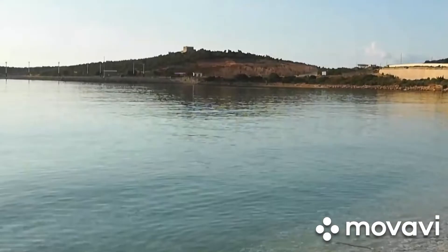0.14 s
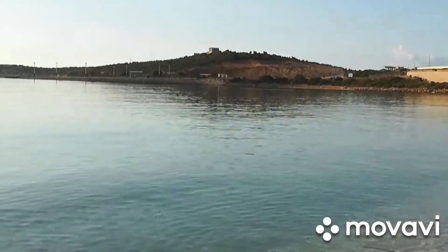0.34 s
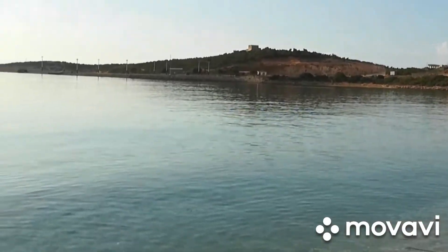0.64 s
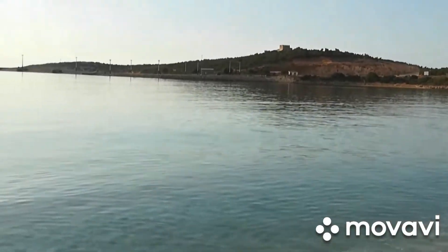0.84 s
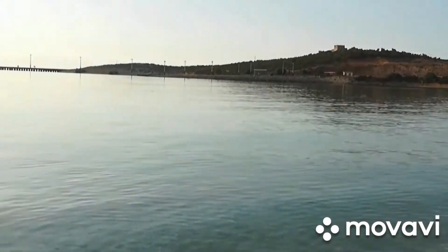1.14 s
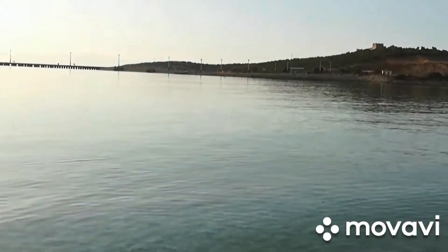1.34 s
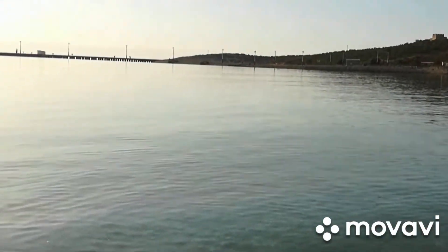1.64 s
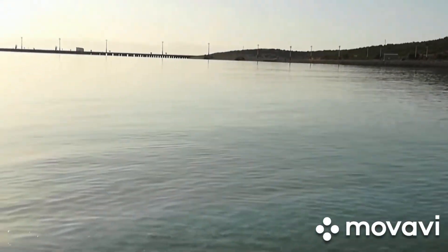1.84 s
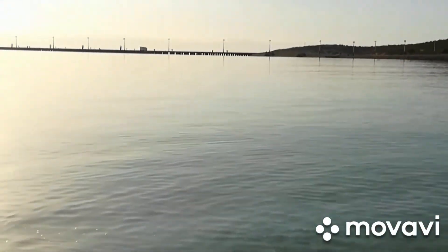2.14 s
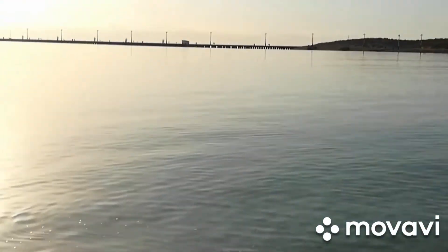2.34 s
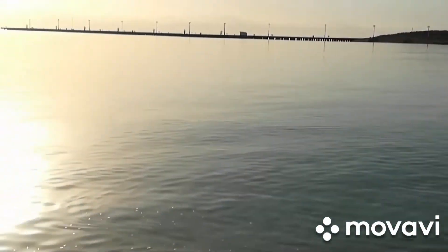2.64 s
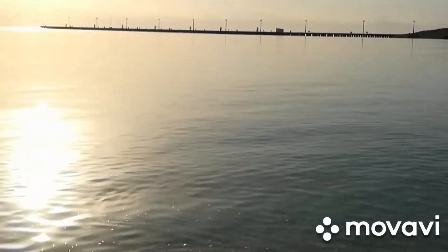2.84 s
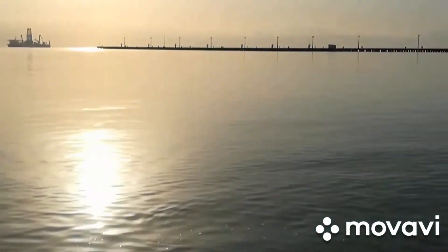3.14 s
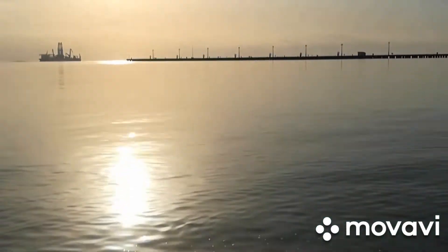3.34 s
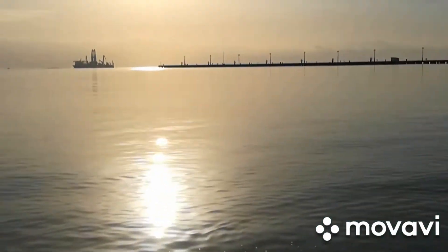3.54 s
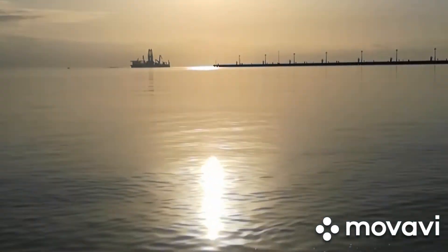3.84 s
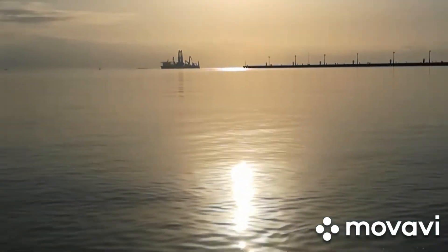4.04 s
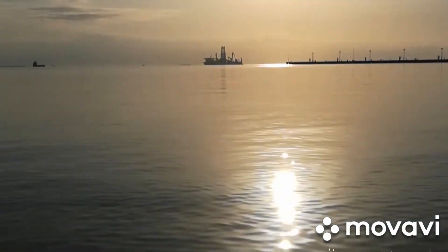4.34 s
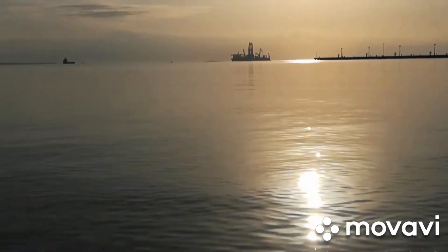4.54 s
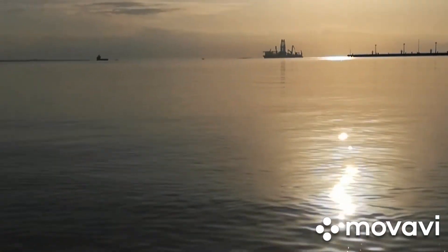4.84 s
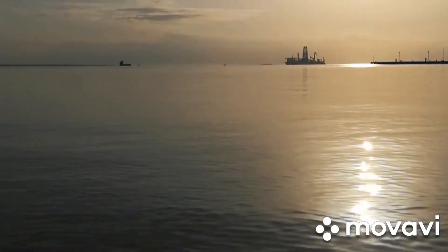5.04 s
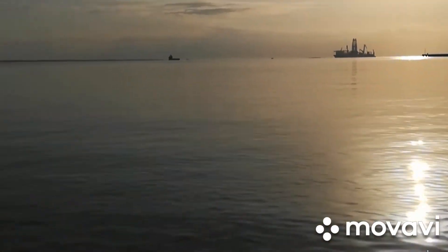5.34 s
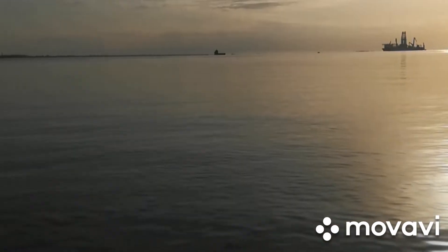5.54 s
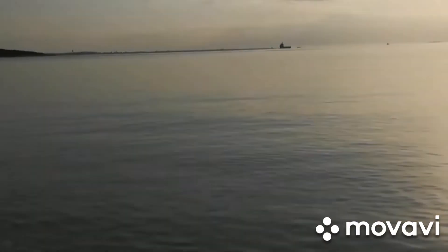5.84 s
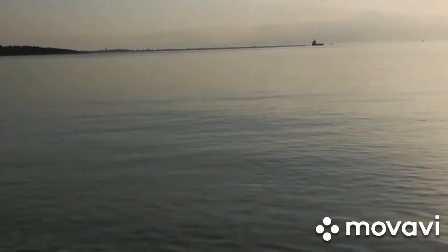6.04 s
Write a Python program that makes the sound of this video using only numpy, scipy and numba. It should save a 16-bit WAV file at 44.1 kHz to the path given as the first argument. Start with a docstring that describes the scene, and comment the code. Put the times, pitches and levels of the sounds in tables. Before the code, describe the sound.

Small waves lap and trickle at a pebble shore, with bright bubbling plips and ticks, over a steady low engine hum and dull distant roar.

```python
"""Small waves on a pebble shore

Small waves of a calm bay lap close to a hand-held pair of microphones.
Each wave is a swarm of dying, climbing sines for bubbles, with short bright ticks for bursting films.
Far engines give a steady hum (a wavering sine), a rumble and a dull roar (shaped noise that drifts).
A faint insect buzzes now and then: wing strokes as bursts of pulses that ring a high tone."""
import sys
import numpy as np
from scipy import signal
from scipy.fft import rfft, irfft
from scipy.io import wavfile
from scipy.ndimage import uniform_filter1d
from numba import njit

SR = 44100
rng = np.random.default_rng(int(sys.argv[2]) if len(sys.argv) > 2 else 0)


def store_pcm(level_fs):
    """Save levels as 16-bit WAV."""
    pcm = np.round(np.clip(level_fs, -1, 1) * 32767).astype(np.int16)
    wavfile.write(sys.argv[1], SR, np.atleast_2d(pcm).T)


N = 273420


def amp(db):
    """Decibels to gain."""
    return 10 ** (np.asarray(db) / 20)


def evened(x):
    """Scales to rms 1."""
    return x / np.sqrt(np.mean(x ** 2) + 1e-20)


def read(points, hz):
    """Reads a spectrum on a log-frequency axis."""
    f, value = np.transpose(points)
    return np.interp(np.log(hz + 1), np.log(f + 1), value)


@njit
def ring(n, sr, s, size, hz, pan_db, cycles, lag_s, rise, onset):
    """Each bubble is a dying sine whose pitch climbs as it nears the surface; the two ports hear it apart."""
    out = np.zeros((2, n))
    for k in range(len(s)):
        decay = cycles[k] / hz[k] / 2
        for ear in range(2):
            side = 1 - 2 * ear  # left +1, right -1
            start = s[k] + side * lag_s[k] / 2
            gain = size[k] * 10 ** (side * pan_db[k] / 40)
            first = int(start * sr) + 1
            for i in range(max(first, 0), min(first + int(5 * decay * sr), n)):
                u = (i / sr - start) / decay  # age in decay times
                turns = cycles[k] / 2 * u * (1 + rise[k] * (u - 1) / 2)
                envelope = (1 - np.exp(-u / onset)) * np.exp(-u)
                out[ear, i] += gain * envelope * np.sin(2 * np.pi * turns)
    return out


def lag(s, scatter_ms):
    """Arrival gap between the ports in seconds, from the bearing of the water line and a scatter along it."""
    # bearing of the water line: t/s, left lags/ms
    bearing = [(0, 0.21), (1.8, 0.26), (2.3, -0.21), (3.2, -0.031), (3.9, -0.057), (4.3, 0.36),
               (4.9, 0.394), (5.3, -0.075), (6.2, 0.16)]
    return (np.interp(s, *np.transpose(bearing)) + scatter_ms) / 1000


def strength(t):
    """Levels of the four bubble sizes and the place of the wash at times t."""
    # strength of the wash: t/s, large bubbles/dB, fine bubbles/dB,
    # step to each finer size/dB, left minus right/dB
    swell = [(0.0, -55.5, -58, -0.5, -6), (0.25, -50.5, -58.5, 1.5, -1.5), (0.5, -72, -66, 5.5, 3),
             (0.8, -57, -57, 2, 2.5), (1.1, -59, -57, -1, 0), (1.48, -49, -51, -0.5, 0),
             (1.85, -53.5, -53, -0.5, 0), (2.42, -66.5, -61, 0.5, -1.5), (2.78, -58.5, -60.5, 2, 1),
             (2.81, -49.5, -54.5, 0.5, 3), (2.92, -48, -52.5, 0.5, 2), (3.06, -46.5, -50, 0, 3.5),
             (3.6, -43, -47.5, 0.5, 2.5), (3.9, -46, -48.5, 0.5, 2), (4.12, -44, -45, -1, 1),
             (4.35, -46, -49, 1.5, 1), (4.65, -54, -50.5, 0.5, -2), (4.8, -55, -58.5, 0, -3),
             (4.9, -56.5, -55.5, -0.5, -2), (5.1, -60, -59.5, 4, 1.5), (5.8, -62.5, -61.5, 3, 2),
             (6.2, -68, -63.5, 4, 1)]
    s, *columns = np.transpose(swell)
    large_db, fine_db, finer_db, pan_db = (np.interp(t, s, v) for v in columns)
    spray_db = fine_db + finer_db - 3.5  # the finest size lies a little below the other fine ones
    return [large_db, fine_db - finer_db, fine_db, spray_db], pan_db


def slaps(t):
    """Gain of short slaps of water on the pebbles: each swells quickly and dies away."""
    # slaps: t/s, nominal rise over the wash/dB
    hits = [(0.045, 6.5), (0.065, 1), (0.125, 11.5), (0.22, 1), (0.478, 3), (0.85, 4), (2.805, 6),
            (3.53, 1), (3.66, 3.5), (3.878, 5), (4.03, 3.5), (4.08, 3.5), (4.705, 6), (4.782, 11.5),
            (4.844, 10)]
    rise_s, fall_s = 0.0037, 0.013
    gain = 1
    for s, db in hits:
        since = np.maximum(t - s, 0)
        gain = gain + 2 * (amp(db) - 1) * (1 - np.exp(-since / rise_s)) * np.exp(-since / fall_s)
    return gain


def wash():
    """Swarms of bubbles of four sizes, a few much louder than the rest, following the strength of the wave."""
    # bubble sizes: lowest f/Hz, highest f/Hz, bubbles a second, base length of ring/cycles,
    # spread of loudness/dB, tilt from lowest to highest/dB
    sizes = [(715, 2350, 3000, 5.85, 2, 12), (2617, 4710, 4000, 9.4, 2, 3.5),
             (4930, 7740, 6000, 5.7, 3.5, 3), (7800, 20000, 13000, 11.3, 3, 1.5)]
    t, out = np.arange(N) / SR, np.zeros((2, N))
    levels_db, pan_db = strength(t)
    # small splashes, hundredths of a second long, raise all the finer bubbles together
    splash_db = 1.17 * evened(uniform_filter1d(rng.standard_normal(N // 200 + 2), size=3))
    splash = amp(np.interp(t * SR / 200, np.arange(len(splash_db)), splash_db))
    slapped = slaps(t)
    for (low_hz, high_hz, rate, cycles, spread_db, tilt_db), db in zip(sizes, levels_db):
        when, pitch, loud, length, place, climb = rng.random((int(rate * N / SR), 6)).T
        at = when * N / SR
        across = 2 * place - 1
        fine = low_hz > 2000  # as an exponent: large bubbles ignore splashes and slaps
        size = amp(spread_db * np.minimum(-np.log(loud + 1e-9), 6) + tilt_db * pitch)
        hz = low_hz * (high_hz / low_hz) ** pitch
        bubble_pan_db = np.interp(at, t, pan_db) - 5 * across
        bubble_cycles = cycles * (0.86 + 0.99 * length)
        swarm = ring(N, SR, at, size, hz, bubble_pan_db, bubble_cycles,
                     lag(at, 0.1 * across), 0.061 * climb, 0.075)
        out += evened(swarm * splash ** fine) * slapped ** fine * amp(db)
    return out


def joined(table, per_s, low_hz, high_hz, over_db, size):
    """Columns of an event table, then lesser events at random whose level partly rides on one bubble size."""
    when, pitch, loud, place = rng.random((int(per_s * N / SR), 4)).T
    s = when * N / SR
    levels_db, pan_db = strength(s)
    # they follow the wash only in part about a middle level, so they stand out in the lulls
    follow, middle_db = 0.79, -52
    db = follow * (levels_db[size] - middle_db) + middle_db + over_db
    db = db - 2.5 * np.log(loud + 0.094)  # a few are much louder
    hz = low_hz * (high_hz / low_hz) ** (pitch ** 1.196)  # leans to the low pitches
    lesser = [s, db, hz, pan_db + 16 * (2 * place - 1)]
    return [np.append(a, b) for a, b in zip(np.transpose(table), lesser)]


def singles(s, db, hz, pan_db, cycles, rise, onset):
    """Plays columns of single bubbles, doubled in gain as onset and decay take off some of the peak."""
    # adding 0 * s turns a single setting into a column
    return ring(N, SR, s, 2 * amp(db), hz, pan_db, cycles + 0 * s, lag(s, 0), rise + 0 * s, onset)


def spatter(s, db, pan_db, low_hz, under_db):
    """A few milliseconds of eight weaker droplets of scattered pitch around each burst."""
    late, pitch, weak = rng.random((len(s) * 8, 3)).T
    at = np.repeat(s, 8) + 0.0049 * late - 0.0012
    droplet_db = np.repeat(db, 8) - under_db - 7.4 * weak
    hz = np.repeat(low_hz, 8) * 3.0 ** pitch
    return singles(at, droplet_db, hz, np.repeat(pan_db, 8), 3.4, 0.025, 0.22)


def plops():
    """Each small bubble rings amid the spatter of the drop that made it."""
    # the clearest small bubbles: t/s, nominal peak/dB, f/Hz, left minus right/dB
    clear = [(0.0424, -32, 3290, -15), (0.0617, -26, 6480, 15), (0.2259, -32, 4620, -16),
             (0.292, -34, 5500, -8), (0.481, -42, 4500, 0), (0.611, -45, 4460, 0), (0.7427, -39, 4300, -3),
             (0.759, -38.5, 4200, -14), (0.8355, -33.5, 3680, -8), (0.8679, -29.5, 3820, -6),
             (1.032, -37.5, 3960, -9), (1.2813, -29, 4320, -12), (1.3673, -26.5, 5900, 2),
             (1.4245, -26, 6600, 5), (1.488, -31, 4900, -3), (1.5529, -30, 3500, -5),
             (1.712, -33.5, 4200, -10), (1.7719, -32, 4100, -8), (1.7985, -25, 4060, -8),
             (1.8525, -35, 3250, 2), (1.925, -30.5, 3460, 11), (2.0228, -35, 3250, -3),
             (2.2938, -28.5, 6900, 4), (2.408, -42, 3980, -2), (2.463, -44, 3980, -6),
             (2.568, -41, 5500, 4), (2.7024, -40, 5710, 1), (2.805, -33.5, 2530, 11),
             (2.817, -23.5, 3340, 1), (3.0754, -31, 7160, 12), (3.257, -24.5, 3950, -4),
             (3.614, -30, 5970, 15), (3.7192, -25, 5450, 8), (3.75, -24.5, 4130, -6),
             (3.8804, -20, 6360, 11), (4.0796, -31.5, 3300, 15), (4.2114, -27, 3460, -4),
             (4.3755, -27, 5860, 0.0), (4.392, -20.5, 6200, 2), (4.417, -26.5, 5250, 2),
             (4.558, -39, 5500, -1), (4.6163, -34, 2740, -12), (4.7176, -28.5, 5000, -12),
             (4.785, -33, 5570, -1), (4.8065, -34, 5100, -10), (4.8464, -28, 6410, 8),
             (5.023, -35, 4730, -10), (5.6044, -39, 5900, 4), (5.966, -41, 4500, 3),
             (5.9878, -39.5, 2620, 2.5)]
    s, db, hz, pan_db = joined(clear, per_s=100, low_hz=2980, high_hz=7540, over_db=10, size=1)
    cycles = np.where(np.arange(len(s)) < len(clear), 9.1, 6.3)  # lesser drips ring shorter
    bubbles = singles(s, db, hz, pan_db, cycles, 0.022, 1.0)
    return bubbles + spatter(s + 0.001177, db, pan_db, 0.678 * hz, 11.0)


def snaps():
    """Each film bursts with one bright tick amid its spatter."""
    # bursting films, short and bright: crest t/s, nominal peak/dB, centre f/Hz, left minus right/dB
    films = [(0.0218, -31.5, 14500, 5), (0.1244, -34, 7840, 6), (1.5407, -35, 10200, 4),
             (1.5877, -31, 14100, 3), (1.7446, -33, 8400, -1), (1.9254, -33, 8000, -4),
             (2.1049, -40, 9200, -1), (2.82, -31, 8900, 6), (3.6393, -30, 12700, -3), (3.657, -32, 8800, 0),
             (3.7595, -31, 12900, -3), (3.8899, -22.5, 9700, -7), (3.9766, -31, 13900, -4),
             (4.024, -21.5, 12800, -7), (4.086, -28, 11000, -9), (4.1505, -32, 13300, -8),
             (4.226, -31, 9600, -6), (4.2404, -20.5, 10700, -5), (4.2828, -31, 11200, -8),
             (4.323, -33, 11200, -12), (4.3923, -30, 10600, -10), (4.4156, -32, 10700, -13),
             (4.4467, -29, 8800, -6), (4.491, -28, 9200, 0), (4.5579, -27, 8800, -7),
             (4.643, -34.5, 8850, -10), (4.7857, -33, 8700, -13)]
    s, db, hz, pan_db = joined(films, per_s=20, low_hz=8000, high_hz=14000, over_db=7.5, size=3)
    ticks = singles(s - 1 / hz, db, hz, pan_db, 4.2, 0.02, 0.26)  # starts one cycle ahead of the crest
    return ticks + spatter(s, db, pan_db, np.full_like(s, 5000), 6.2)


def glugs():
    """Large bubbles ring longer and climb in pitch."""
    # large bubbles, heard as glugs: t/s, nominal peak/dB, f/Hz, left minus right/dB,
    # pitch climb per decay time/share
    large = [(0.122, -41.5, 1610, -16, 0.23), (.139, -38, 2650, -12, 0.14), (.175, -39.5, 1560, -18, 0.2),
             (1.649, -29, 1370, 0, 0.032), (2.847, -35, 1740, 5, 0.31), (2.896, -33, 2030, -2, .03),
             (3.074, -35, 1780, -9, 0.13), (3.139, -33, 1600, -5, 0.23), (3.529, -28, 1940, -2, 0.0004),
             (3.59, -33.5, 1035, 0, .2), (3.935, -41, 820, -11, 0.25), (3.976, -37, 1460, 2, 0.14),
             (4.054, -35.5, 1480, -1, 0), (4.13, -31.5, 1460, 2, 0.17), (4.19, -44, 720, -19, 0.34),
             (4.329, -38, 2250, 1, 0.041), (4.446, -38, 948, -11, 0.059), (4.781, -35.5, 1500, -5, 0.053),
             (5.488, -47, 2820, 11, .04), (5.512, -49, 3350, 0, .03), (5.54, -42.5, 1460, -1, 0.21),
             (5.54, -48.5, 650, -8, 0), (5.597, -42, 1270, 0, 0.027), (5.825, -44, 2000, 3, 0),
             (5.866, -46, 1550, 2, 0), (5.919, -44, 2080, 0, 0.026)]
    s, db, hz, pan_db = joined(large, per_s=25, low_hz=799, high_hz=2294, over_db=4.5, size=0)
    climb = np.append(np.transpose(large)[-1], 0.147 * rng.random(len(s) - len(large)))
    return singles(s, db, hz, pan_db, 13.34, climb, 0.8)


def insect():
    """Every wing stroke drags a few file teeth over a scraper and rings the wing."""
    # buzzes: start t/s, end t/s, level ahead of the band-pass/dB
    buzzes = [(.62, .68, -65), (.73, .83, -62), (.83, .93, -64.5), (.94, 1.04, -69), (5.24, 5.31, -64),
              (5.31, 5.38, -67), (5.46, 5.49, -67), (6.14, 6.2, -66)]
    stroke_hz, tooth_hz = 200, 1048
    wing_hz = 10 * tooth_hz
    t = np.arange(N) / SR
    into = (t * stroke_hz % 1) / stroke_hz  # time since the stroke began
    teeth = np.exp(-(into * tooth_hz % 1) / 0.07) * np.sin(np.pi * into * stroke_hz) ** 2
    buzz = evened(teeth * np.cos(2 * np.pi * wing_hz * into))
    band = signal.butter(2, [9000, 12800], "bandpass", fs=SR, output="sos")
    buzz = signal.sosfilt(band, buzz)
    on = sum(amp(db) * np.clip(np.minimum(t - a, b - t) / 0.0075, 0, 1) for a, b, db in buzzes)
    return buzz * on * amp([[-1.5], [1.5]])  # a little to the right


def hum():
    """One steady engine tone that wavers a little on its way over the water."""
    hum_hz, hum_db = 76.34, -43
    t = np.arange(N) / SR
    waver = evened(sum(np.sin(2 * np.pi * (f * t + rng.random())) for f in np.geomspace(0.5, 9, 20)))
    return np.sqrt(2) * amp(hum_db + 0.5 * waver) * np.sin(2 * np.pi * hum_hz * t)


def far():
    """Random short-time spectra with soft patches; rumble, drone and roar drift on their own."""
    # far rumble, roar and the steady hiss of air and water: f/Hz, relative level per Hz/dB
    colour = [(12, -46), (20, -14), (53, -8.5), (81, -9.5), (101, -7), (123, -11), (216, -13.5),
              (459, -28.5), (558, -27.5), (1000, -20), (2390, -37.5), (6540, -47.5), (9670, -49.5),
              (14700, -65), (16000, -39)]
    # drift, of which the three levels count only as departures from their means:
    # t/s, rumble/dB, drone/dB, roar/dB, roar left minus right/dB
    drift = [(0.0, -51, -60, -49.5, 7.5), (0.5, -48.5, -60, -50.5, 8), (1.2, -52, -65.5, -53.5, 1.5),
             (2.0, -49, -63.5, -50, 1.5), (2.75, -51.5, -62, -53.5, 7.5), (3.3, -51.5, -60, -54, -12),
             (4.2, -52.5, -65.5, -58, -21), (5.0, -52, -68, -55, 4.5), (5.8, -50.5, -68.5, -58.5, 2.5),
             (6.2, -59, -66.5, -60, 4)]
    # left-right likeness of the far sounds: f/Hz, likeness (0 to 1)
    likeness = [(60, 0.99), (150, 0.99), (270, 0.99), (450, 0.52), (700, 0.29), (950, 0.72), (1500, 0.64),
                (3000, 0.064)]
    # phase by which the left port leads: f/Hz, lead/rad
    lead = [(100, 0), (150, 0), (270, 0.62), (450, 0.9), (700, 0.94), (1000, 0)]
    frames, hz = N // 512 + 5, np.fft.rfftfreq(2048, 1 / SR)
    a, b, c, d, patches = rng.standard_normal((frames, 1025, 5)).T
    patches = uniform_filter1d(patches, size=14, axis=0)  # across frequency
    patches = evened(uniform_filter1d(patches, size=8, axis=1))  # along time
    s, *columns = np.transpose(drift)
    frame_s = np.arange(frames) * 512 / SR
    rumble_db, drone_db, roar_db, pan_db = (np.interp(frame_s, s, v) for v in columns)
    # bands: rumble to 290 Hz, drone to 580 Hz, roar to 1800 Hz
    low, rumble = np.exp(-(hz / 580) ** 6), np.exp(-(hz / 290) ** 6)
    roar = (1 - low) * np.exp(-(hz / 1800) ** 4)
    drift_db = np.outer(rumble, rumble_db - rumble_db.mean())
    drift_db += np.outer(low - rumble, drone_db - drone_db.mean())
    drift_db += np.outer(roar, roar_db - roar_db.mean())
    same = np.clip(read(likeness, hz), -1, 1)[:, None]
    left = a + 1j * b
    right = same * left + np.sqrt(1 - same ** 2) * (c + 1j * d)
    right = right * np.exp(-1j * read(lead, hz))[:, None]
    side = amp(np.outer(roar, pan_db) / 2)  # the roar swings across as the microphones turn
    level = amp(read(colour, hz)[:, None] + drift_db + 0.78 * patches)
    spectra = np.array([left * side, right / side]) * level
    noise = signal.istft(spectra, nperseg=2048, noverlap=1536)[1][:, :N]
    return amp(-45.5) * evened(noise)


def scene():
    """Engines, far noise, water and insect together."""
    return hum() + far() + wash() + glugs() + plops() + snaps() + insect()


def record(dry):
    """The two ports differ in colour; then a low-pass at 16 kHz limits the band."""
    # colour of the two microphone ports: f/Hz, left minus right/dB
    ports = [(300, 0), (600, 2.5), (1200, -2.4), (2500, -1), (5500, 2), (9000, 1), (14000, -3.5)]
    hz = np.fft.rfftfreq(N, 1 / SR)
    coloured = irfft(rfft(dry) * amp(np.outer([0.5, -0.5], read(ports, hz))), N)
    lowpass = signal.firwin(511, 16000, window=("kaiser", 9), fs=SR)
    return signal.oaconvolve(coloured, lowpass[None], "same")


dry = scene()
out = record(dry)
store_pcm(out)
```